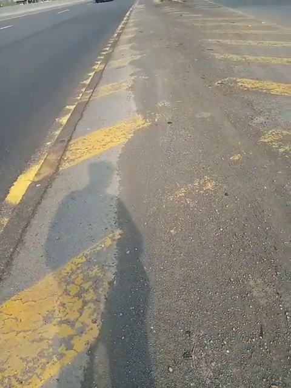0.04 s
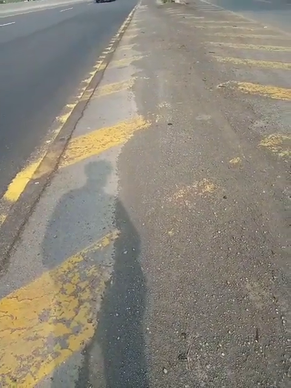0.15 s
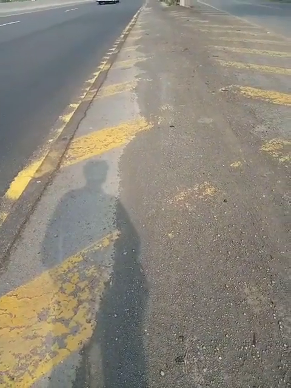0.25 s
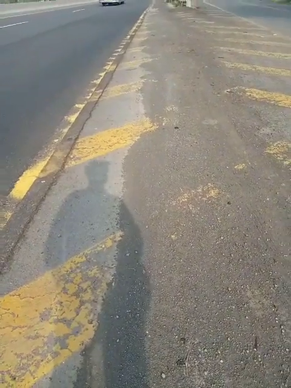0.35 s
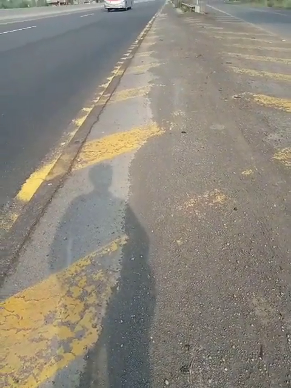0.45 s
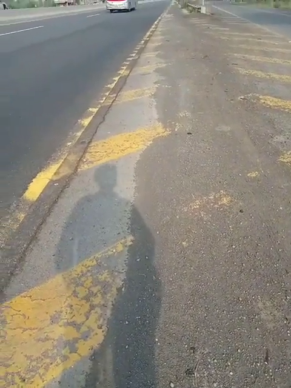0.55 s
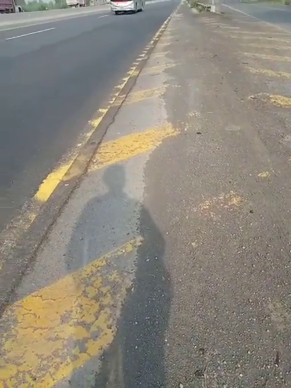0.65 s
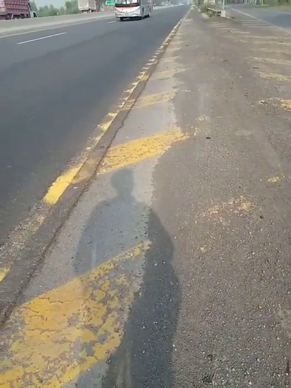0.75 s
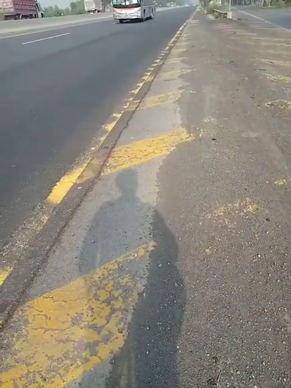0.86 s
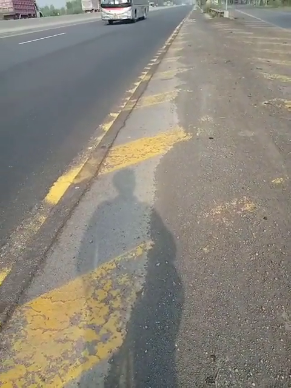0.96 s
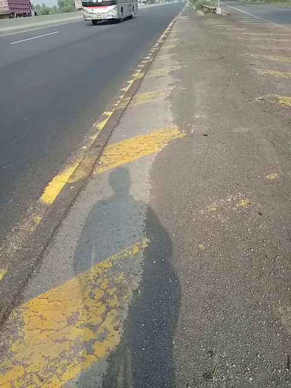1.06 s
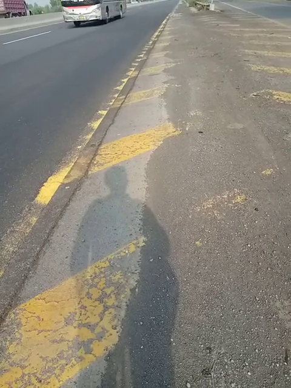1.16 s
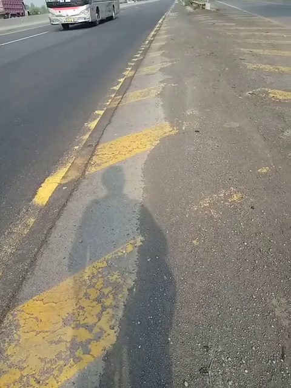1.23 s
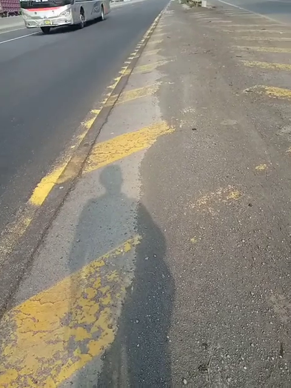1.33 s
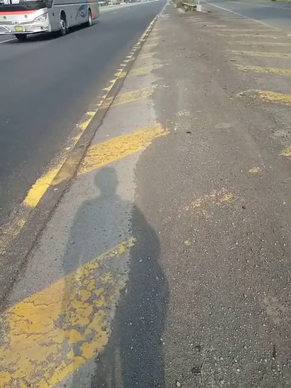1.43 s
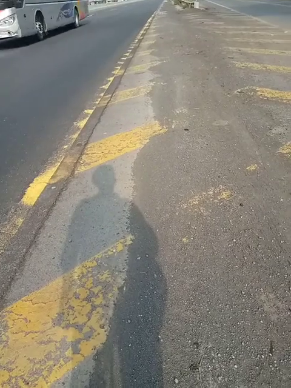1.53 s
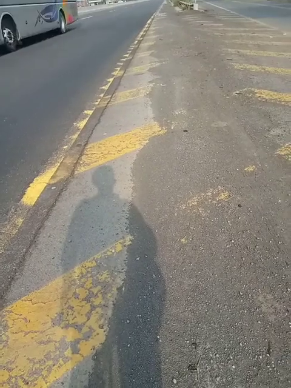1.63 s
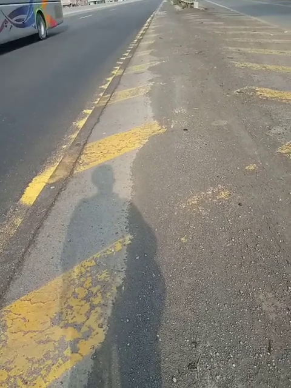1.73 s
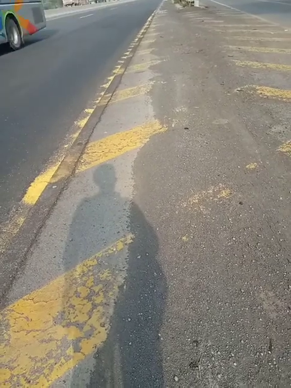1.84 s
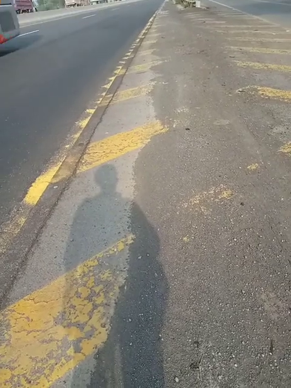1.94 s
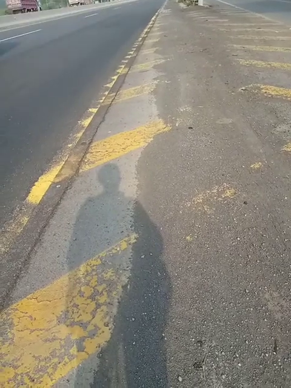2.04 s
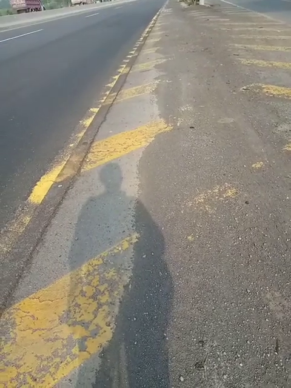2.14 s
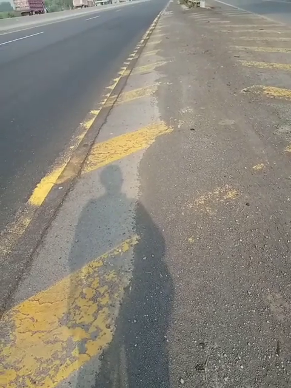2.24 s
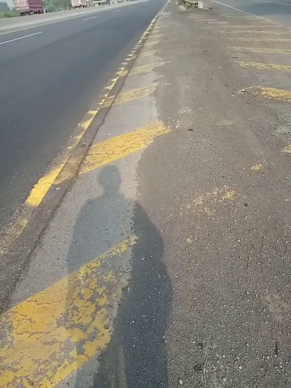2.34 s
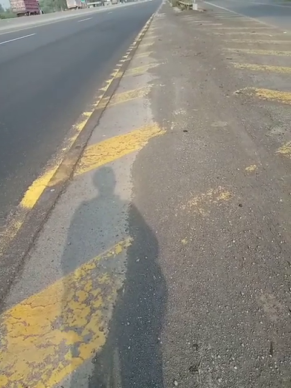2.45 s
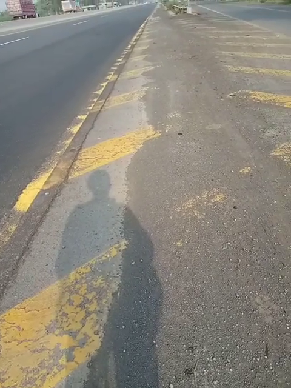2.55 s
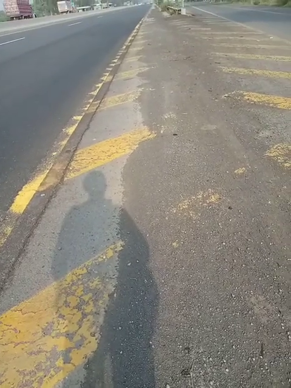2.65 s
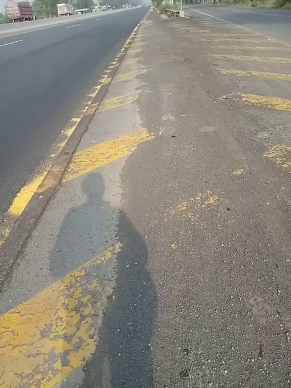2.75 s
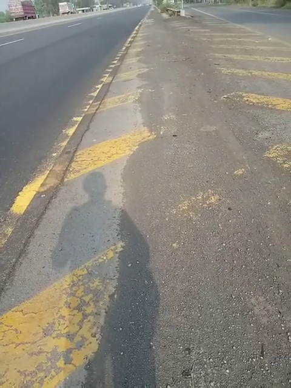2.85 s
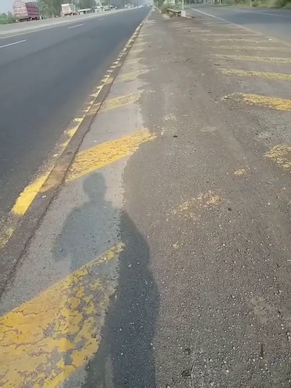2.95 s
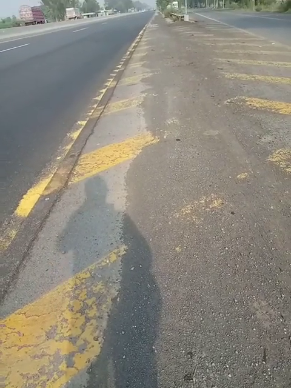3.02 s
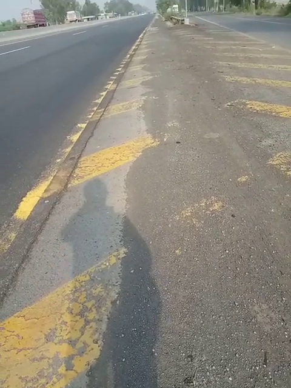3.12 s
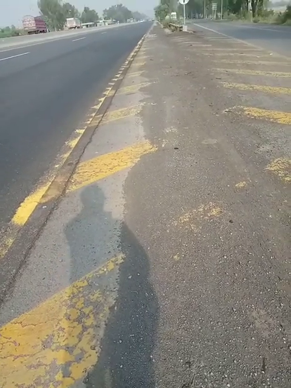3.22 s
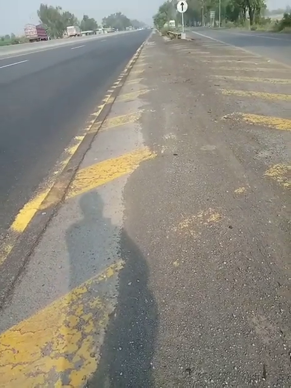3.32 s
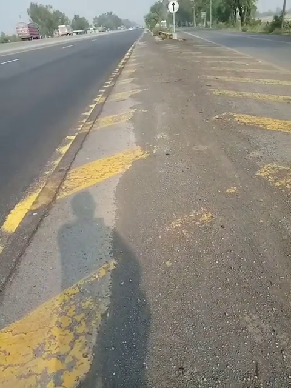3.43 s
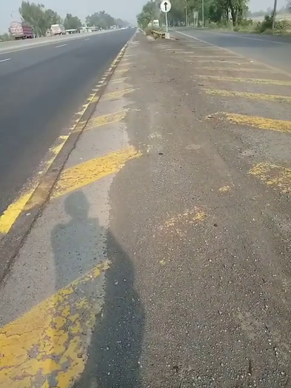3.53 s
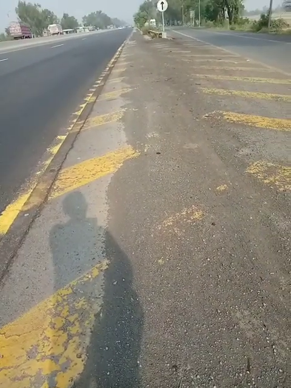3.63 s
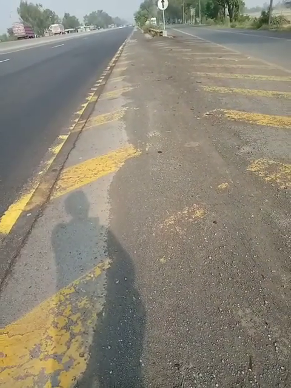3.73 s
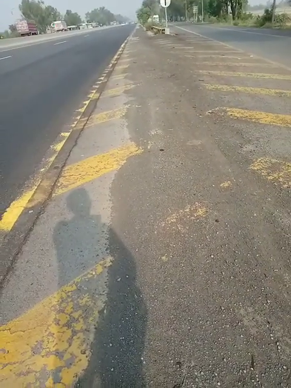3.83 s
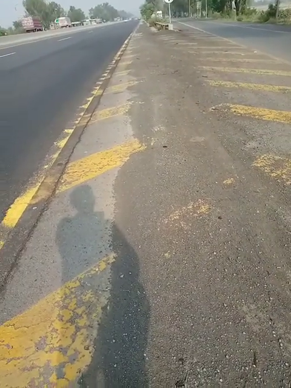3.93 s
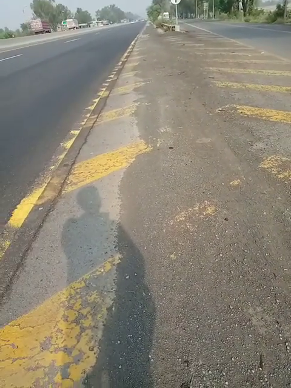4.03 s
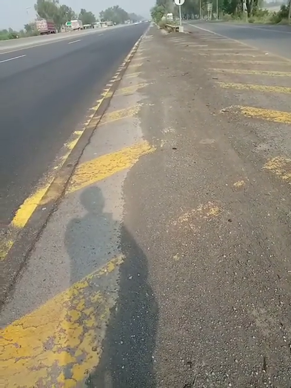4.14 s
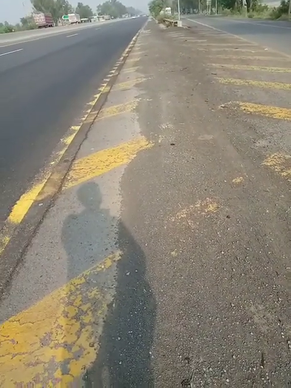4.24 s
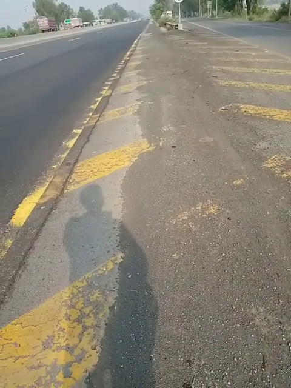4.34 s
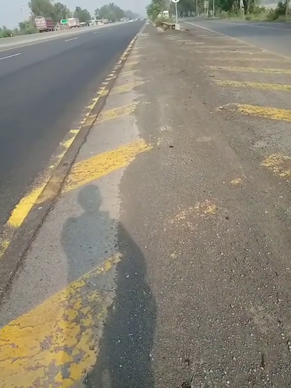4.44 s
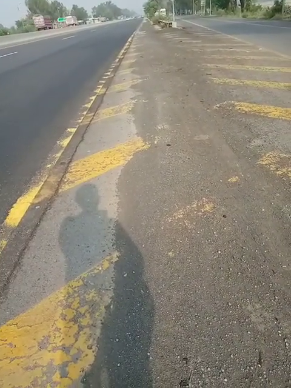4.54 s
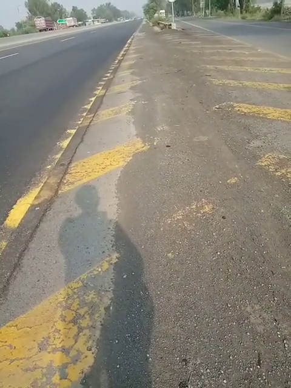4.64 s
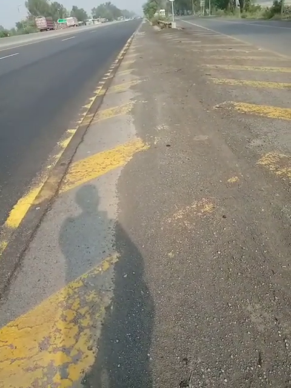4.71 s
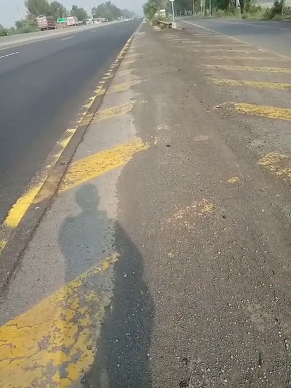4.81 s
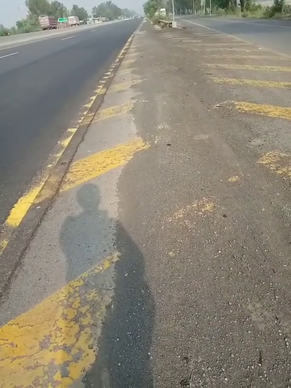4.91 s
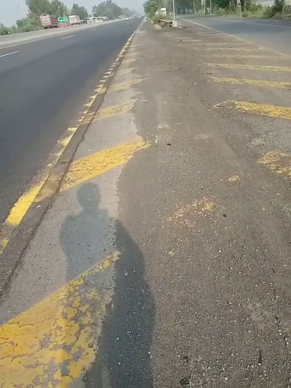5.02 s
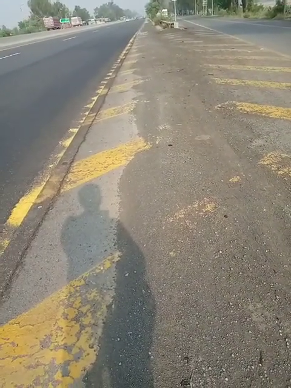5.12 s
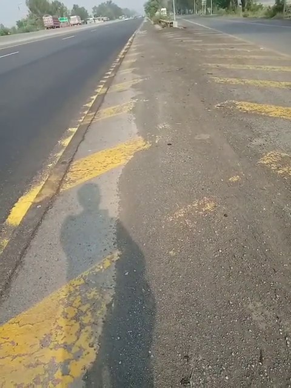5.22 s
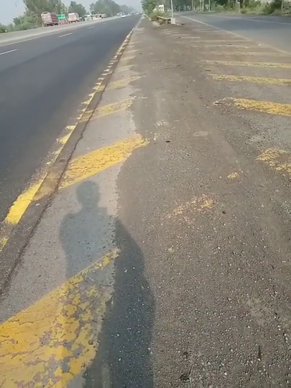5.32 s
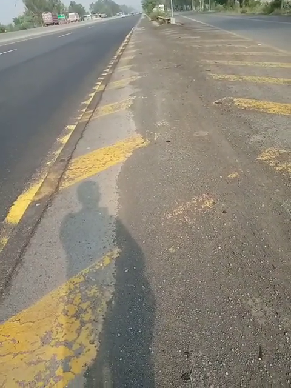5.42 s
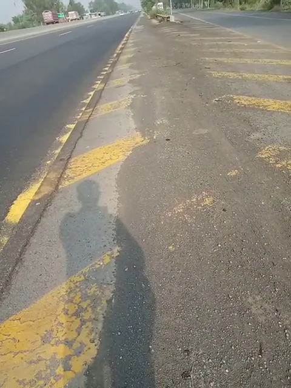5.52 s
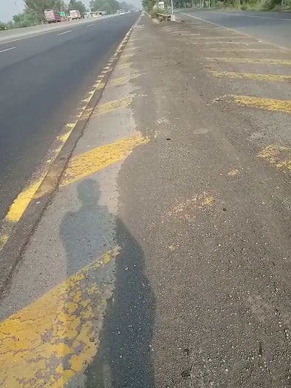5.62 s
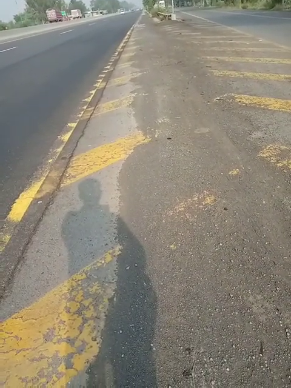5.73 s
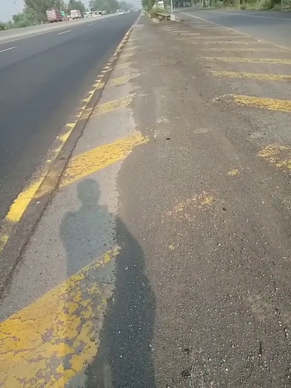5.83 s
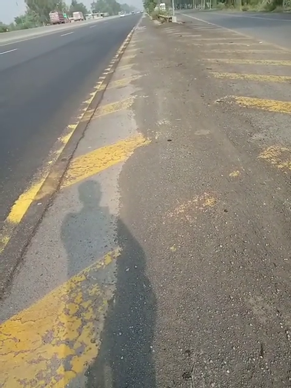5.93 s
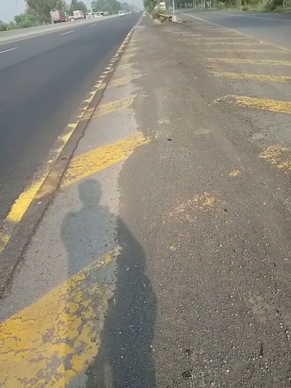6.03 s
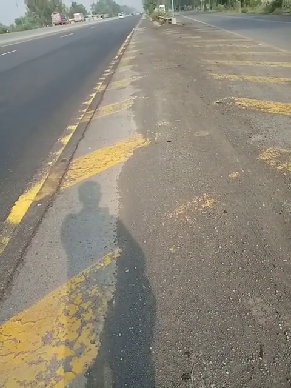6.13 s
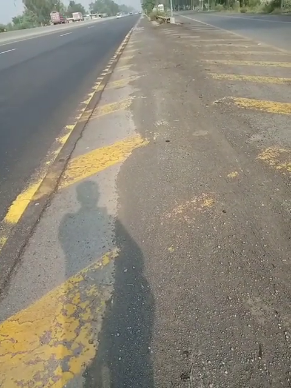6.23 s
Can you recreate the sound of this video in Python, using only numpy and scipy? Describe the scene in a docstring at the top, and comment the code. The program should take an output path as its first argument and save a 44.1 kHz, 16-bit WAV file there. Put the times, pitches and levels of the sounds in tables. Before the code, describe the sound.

Low traffic hum with light wind bumps and two tiny clicks, one loud bus pass-by with receding exhaust drone, then bird chips and whistles.

```python
"""On a highway verge, far traffic hums; two small clicks sound and wind buffets the microphone at times.
A diesel bus passes: bands of shaped noise swell with nearness as tyre roar and hiss, and engine sines drop in pitch.
Its tailpipe drones on as it leaves, while a bird chips, whistles four arched calls as summed overtones,
then chips again among faint rasps of noise."""
import sys
import numpy as np
from scipy import signal
from scipy.fft import rfft, irfft, next_fast_len
from scipy.io import wavfile
from scipy.ndimage import uniform_filter1d

SR = 44100
rng = np.random.default_rng(int(sys.argv[2]) if len(sys.argv) > 2 else 0)


def store_pcm(level_fs):
    """Save levels as 16-bit WAV."""
    pcm = np.round(np.clip(level_fs, -1, 1) * 32767).astype(np.int16)
    wavfile.write(sys.argv[1], SR, np.atleast_2d(pcm).T)


N = 276507
TIME = np.arange(N) / SR
HOP, WINDOW = 256, 1024  # samples per step and per frame of the noise spectra
FRAME_S = np.arange(N // HOP + 5) * HOP / SR
BIN_HZ = np.fft.rfftfreq(WINDOW, 1 / SR)

# closest moment of the bus, its closest distance / speed
PASS_S, PASS_SPREAD_S = 2.47, 0.2302

# passes: bus front wheels, body, rear wheels, then another vehicle farther off (two rows) and a late faint one
# closest_s, spread_s (distance / speed, before each band's breadth), rumble_db, roar_db, rasp_db, hiss_db
PASS_ROWS = [(1.909, 0.25, -42, -37.5, -57.5, -52.5), (2.11, 0.35, -26, -29.5, -40.5, -45.5),
             (2.41, 0.19, -40, -26.5, -37, -42.5), (3.43, 0.53, -45.5, -59, -51, -67),
             (3.88, 0.82, -52, -45.5, -68, -73.5), (6.6, 0.5, -52, -57.5, -61.5, -78)]


def gain_of(db):
    """Decibels to amplitude."""
    return 10 ** (np.asarray(db) / 20)


def evened(x):
    """Scales to rms 1."""
    return x / np.sqrt(np.mean(x ** 2) + 1e-20)


def curve(rows, t):
    """Joins rows by straight lines."""
    return np.interp(t, *np.transpose(rows))


def read(points, hz):
    """Reads a spectrum on a log-frequency axis."""
    f, value = np.transpose(points)
    return np.interp(np.log(hz + 1), np.log(f + 1), value)


def bell(x, centre, spread):
    """Gaussian hump of height 1."""
    return np.exp(-.5 * ((x - centre) / spread) ** 2)


def add(mix, s, sound):
    """Mixes a sound in at time s."""
    part = mix[round(s * SR):][:len(sound)]
    part += sound[:len(part)]


def filtered(x, response):
    """Filters by a gain given as a function of frequency."""
    size = next_fast_len(N + 4096)
    spectrum = rfft(x, size) * response(np.fft.rfftfreq(size, 1 / SR))
    return irfft(spectrum, size)[:N]


def noise(response):
    """Coloured noise of rms 1."""
    return evened(filtered(rng.standard_normal(N), response))


def waver(rate_hz):
    """Slow random drift of rms 1, low-passed at about rate_hz."""
    f = np.fft.rfftfreq(2048, HOP / SR)
    slow = irfft(rfft(rng.standard_normal(2048)) * bell(f, 0, rate_hz))[:len(FRAME_S)]
    return np.interp(TIME, FRAME_S, evened(slow))


def distance(s, spread_s):
    """Distance of something driving past, in units of its closest distance."""
    return np.hypot(1, (TIME - s) / spread_s)


def road(lumpy_db=0.45):
    """Body rumble, tyre roar, tread rasp and the hiss of air squeezed from the tread."""
    colour, sweep = road_colour(), hiss_beams()
    # bands and level-setting cores, Hz
    low, mid, high, top = (1, 400), (400, 1400), (1400, 3200), (3200, 20000)
    low_core, top_core = (125, 400), (4400, 5600)
    _, _, rumble_db, roar_db, rasp_db, hiss_db = np.transpose(PASS_ROWS)

    rumble = traffic_level(rumble_db, breadth=1.68, far_db=-39.5, recede_db_per_s=1.44)
    rumble = rumble * gain_of(lumpy_db * waver(4.1))
    roar = traffic_level(roar_db, breadth=1.048, far_db=-49.5, recede_db_per_s=0.62)
    rasp = traffic_level(rasp_db, breadth=1.063, far_db=-55.0, recede_db_per_s=2.15)
    hiss = traffic_level(hiss_db, breadth=1.266, far_db=-67.5, recede_db_per_s=1.5)

    return (road_layer(colour, sweep, rumble, low, low_core, patchy_db=0.04, flutter_db=-0.47)
            + road_layer(colour, sweep, roar, mid, mid, patchy_db=0.82, flutter_db=0.3)
            + road_layer(colour, sweep, rasp, high, high, patchy_db=0.84, flutter_db=1.26)
            + road_layer(colour, sweep, hiss, top, top_core, patchy_db=1.2, flutter_db=1.1))


def road_layer(colour, sweep, level, band, core, patchy_db, flutter_db):
    """One band of road noise; its core follows the traffic level and turbulent air makes it patchy."""
    f = BIN_HZ + 1
    shape = colour / np.sqrt((1 + (band[0] / f) ** 12) * (1 + (f / band[1]) ** 12))
    in_core = (f > core[0]) & (f < core[1])
    core_power = (colour[:, in_core] ** 2).sum(1, keepdims=True)
    real, imag, patches = rng.standard_normal((3, len(FRAME_S), len(f)))
    patches = uniform_filter1d(patches, size=14, axis=0)
    patches = evened(uniform_filter1d(patches, size=9, axis=1))
    size = sweep * shape / np.sqrt(core_power) * gain_of(patchy_db * patches)
    z = (real + 1j * imag) * size
    sound = signal.istft(z.T, nperseg=WINDOW, noverlap=WINDOW - HOP)[1][:N]
    sound = sound * np.sqrt(1.5)  # makes up for the overlapping windows
    return sound * level * gain_of(flutter_db * waver(18))


def road_colour(dull_db=14, bright_spread_s=0.48, bright_s=2.04):
    """The spectrum turns from the front of the bus to its side, its rear and far traffic (frames x bins)."""
    # road noise spectra by side shown, each: pitch_hz, level_db (per Hz)
    ahead, nearing, abreast = [(45, -33), (70, 1.5), (120, 1), (200, 4), (310, -1.5), (480, -16.5),
                               (680, -20), (900, -18.5), (1200, -25), (1800, -21.5), (2050, -27),
                               (3400, -25.5), (5400, -35), (6300, -32.5)], [(25, -22), (45, -15), (70, -23), (120, -4.5), (190, 6),
                                              (300, -7), (420, -12.5), (600, -16.5), (1100, -23.5),
                                              (2000, -21.5), (2700, -23.5), (4300, -23.5), (5500, -27),
                                              (6400, -27.5)], [(25, -26), (45, -9), (70, -11), (120, 0),
                                                               (190, 3.5), (330, -3.5), (500, -4),
                                                               (800, -2.5), (1300, -12.5), (2400, -25),
                                                               (3500, -18), (4400, -18.5), (5200, -19.5),
                                                               (6300, -17)]
    behind, far = [(25, -31), (45, -13.5), (70, -3.5), (100, -10), (170, 2), (320, -7), (500, -20),
                   (850, -22), (1300, -25), (2100, -25.5), (2900, -29), (3600, -35.5), (4600, -29.5),
                   (6400, -35)], [(25, -25.5), (45, -21.5), (70, 12), (100, -4.5), (200, 6), (320, -5),
                                   (500, -8.5), (850, -13), (1300, -23), (2100, -30.5), (3000, -30),
                                   (4000, -32), (5200, -30.5), (6400, -39)]
    # moments when each spectrum holds alone: time_s
    view_s = [1.0, 1.85, 2.45, 2.9, 4.3]
    views = [ahead, nearing, abreast, behind, far]
    db = 0
    for share, view in zip(np.eye(len(views)), views):
        db = db + np.interp(FRAME_S, view_s, share)[:, None] * read(view, BIN_HZ)
    # the highest fizz only arrives while the wheels are close
    dull = 1 - bell(FRAME_S, bright_s, bright_spread_s)
    db = db - dull_db * np.outer(dull, np.interp(BIN_HZ, [7000, 13000], [0, 1]))
    return gain_of(db)


def hiss_beams():
    """Gain of the narrow beams of hiss that sweep past with the bus (frames x bins)."""
    # beams: centre_s, spread_s, centre_hz, spread_hz, boost_db
    beam_rows = [(1.25, 0.4, 10400, 800, 8.5), (1.6, 0.15, 2880, 450, 6.5), (2.254, 0.054, 4900, 403, 9),
                 (2.354, 0.059, 5880, 500, 5.5), (2.467, 0.26, 2375, 350, 9), (2.6, 0.22, 4290, 200, 6.5),
                 (2.752, 0.16, 2960, 180, 10)]
    return gain_of(sum(db * np.outer(bell(FRAME_S, s, spread_s), bell(BIN_HZ, hz, spread_hz))
                       for s, spread_s, hz, spread_hz, db in beam_rows))


def traffic_level(peaks_db, breadth, far_db, recede_db_per_s, falloff=2.037):
    """Each pass fades as distance to the falloff, as it beams sideways, over slowly receding far traffic."""
    power = gain_of(far_db - recede_db_per_s * TIME) ** 2
    for (s, spread_s, *_), db in zip(PASS_ROWS, peaks_db):
        power = power + (gain_of(db) / distance(s, breadth * spread_s) ** falloff) ** 2
    return np.sqrt(power)


def engine(firing_hz=115.27, mach=.0775, wander=0.003, fading_db=1.8, beside_spread_s=0.18, jitter_rad=.08):
    """Doppler-shifted engine and fan lines, heard from the flank while passing, then from the tailpipe."""
    # lines: multiple (of the firing rate), loudest_s, flank_db (at loudest), pipe_db (relative to tailpipe level)
    order_rows = [(.85, 2.75, -44.5, -8), (.995, 2, -50, 1), (1.2, 2.05, -39.5, -25),
                  (1.5, 2.55, -35.5, -13), (1.64, 2.0, -34.5, -15), (2, 2.285, -28, -5.5),
                  (2.28, 2.24, -29.5, -16), (3, 2.2, -41, -12), (3.26, 2.1, -48.5, -15.5),
                  (4.04, 2.337, -32, -31.5), (4.58, 2.2, -40, -25.5), (5, 2.3, -41.5, -21)]
    hz = firing_hz / (1 - mach * bearing(TIME)) * (1 + wander * waver(4.5))
    turns = np.cumsum(hz) / SR
    tailpipe = tailpipe_level()
    out = np.zeros(N)
    for multiple, loudest_s, flank_db, pipe_db in order_rows:
        # each line beams its own way
        flank = 1 / np.hypot(1, ((TIME - loudest_s) / beside_spread_s) ** 2)
        size = gain_of(flank_db) * flank + gain_of(pipe_db) * tailpipe
        size = size * gain_of(fading_db * waver(4.5))
        phase = 2 * np.pi * (multiple * turns + rng.random()) + jitter_rad * multiple * waver(17)
        out += np.sqrt(2) * size * np.sin(phase)
    return out


def bearing(t):
    """Cosine of the angle to the bus: 1 coming, 0 abreast, -1 leaving."""
    return (PASS_S - t) / np.hypot(PASS_S - t, PASS_SPREAD_S)


def tailpipe_level(open_s=2.64, turn_s=0.037, abreast_db=-31.5, front_loss_db=-22.5, fall_db_per_decade=13):
    """The exhaust drone opens up behind the bus and fades with distance."""
    shaded = .5 - .5 * np.tanh((TIME - open_s) / (2 * turn_s))
    fall_db = fall_db_per_decade * np.log10(distance(PASS_S, PASS_SPREAD_S))
    return gain_of(abreast_db + front_loss_db * shaded - fall_db)


def bird():
    """Arched whistles, quick gliding chips and breathy rasps."""
    return whistles() + chips() + rasps()


def whistles():
    """Four arched calls, each a sum of overtones without the fundamental."""
    # calls: start_s, length_s, top_hz (of the fundamental), arch_depth (factor), level_db
    call_rows = [(3.357, .124, 2108, 1.25, -53.5), (3.608, .119, 2004, .9, -50),
                 (3.853, .127, 1998, 1, -49), (4.113, .134, 1935, .65, -49)]
    # pitch arch at depth 1: share (of the call), offset (relative to top_hz)
    arch = [(0, -.1), (.11, -.045), (.26, -.01), (.48, 0), (.72, -.01), (.86, -.05), (1, -.21)]
    # overtones: multiple, level_db (relative)
    partials = [(2, 0), (3, -19), (4, -27)]
    out = np.zeros(N)
    for s, length_s, top_hz, depth, db in call_rows:
        u = np.linspace(0, 1, int(length_s * SR))
        phase = 2 * np.pi * np.cumsum(top_hz * (1 + depth * curve(arch, u))) / SR
        tone = sum(gain_of(partial_db) * np.sin(round(k) * phase) for k, partial_db in partials)
        add(out, s, gain_of(db) * evened(tone * signal.windows.tukey(len(u), .17)))
    return out


def chips(jitter=0.027):
    """Thin sine strokes gliding up or down with a shaky pitch."""
    # strokes: start_s, length_s, start_hz, end_hz (both before jitter), level_db
    chip_rows = [(3.141, 0.088, 6650, 6550, -64), (3.214, 0.015, 4420, 3220, -52.5),
                 (4.616, .015, 5780, 5300, -63), (4.972, 0.017, 6500, 5630, -62),
                 (5.003, 0.01, 4180, 5500, -66), (5.005, 0.02, 4960, 4140, -60),
                 (6.168, 0.027, 6980, 5000, -55.5), (6.206, 0.014, 4050, 6300, -57),
                 (6.21, 0.013, 5900, 4170, -51), (6.218, 0.024, 4450, 3150, -60)]
    out = np.zeros(N)
    for s, length_s, start_hz, end_hz, db in chip_rows:
        hz = np.geomspace(start_hz, end_hz, int(length_s * SR))
        shake = evened(uniform_filter1d(rng.standard_normal(len(hz)), size=30))
        hz = hz * (1 + jitter * shake)
        tone = np.sin(2 * np.pi * np.cumsum(hz) / SR)
        add(out, s, gain_of(db) * evened(tone * signal.windows.tukey(len(hz), .5)))
    return out


def rasps():
    """Faint raspy chirps: short humps of coloured noise."""
    # rasps: centre_s, spread_s, level_db
    rasp_rows = [(4.98, .018, -59), (5.22, .018, -69), (5.335, .016, -68), (5.567, .019, -63),
                 (5.8, .019, -63.5), (5.91, .016, -62.5), (6.205, .022, -58), (6.255, .014, -60)]
    # spectrum: pitch_hz, level_db (relative)
    colour = [(2000, -31.5), (3500, -1), (5000, 12), (6400, 7.5), (8000, -19)]
    level = sum(gain_of(db) * bell(TIME, s, spread_s) for s, spread_s, db in rasp_rows)
    return level * noise(lambda f: gain_of(read(colour, f)))


def off_the_ground(x, delay_s=0.0086, echo_db=-16):
    """A sound with its bounce off the asphalt."""
    return filtered(x, lambda f: 1 + gain_of(echo_db) * np.exp(-2j * np.pi * f * delay_s))


def clicks():
    """Tiny dry ticks close to the microphone: decaying modes."""
    # ticks: start_s, peak_db, pitch (factor on the modes)
    click_rows = [(0.1184, -15.5, 0.98), (1.1682, -20, 1.2)]
    # modes at pitch 1: mode_hz, level_db (relative), t60_s
    modes = [(4260, -18, .003), (5560, 2.5, .0022), (6600, 5, 0.0018), (10350, 13.5, 0.0017)]
    out, t = np.zeros(N), np.arange(512) / SR
    for s, db, pitch in click_rows:
        ring = sum(gain_of(mode_db - 60 * t / t60_s) * np.sin(2 * np.pi * pitch * hz * t)
                   for hz, mode_db, t60_s in modes)
        add(out, s, gain_of(db) * ring / abs(ring).max())
    return out


def wind(centre_hz=100, width_hz=33):
    """Soft low buffets on the microphone: swells of narrow low noise."""
    # gusts: centre_s, spread_s, level_db
    gust_rows = [(.12, 0.051, -58), (0.478, 0.039, -31), (0.885, 0.26, -42), (1.282, 0.031, -35.5),
                 (1.454, 0.044, -37), (2.66, 0.053, -38.5)]
    level = sum(gain_of(db) * bell(TIME, s, spread_s) for s, spread_s, db in gust_rows)
    return noise(lambda f: bell(f, centre_hz, width_hz)) * level


def scene():
    """Everything heard from the verge."""
    return (road() + engine() + off_the_ground(bird()) + clicks() + wind())[None]


def record(dry, low_cut_hz=48, edge_hz=15750):
    """The phone thins the deep bass and the treble; then the band limit."""
    # treble response: pitch_hz, gain_db
    treble = [(6600, 0), (7200, -8), (8000, -21), (9500, -26), (12000, -30), (14000, -31), (14800, -18),
              (16000, -18)]
    coloured = filtered(dry[0], lambda f: gain_of(read(treble, f)) * f ** 3 / np.hypot(f ** 3, low_cut_hz ** 3))
    band_limit = signal.firwin(511, edge_hz, window=("kaiser", 9), fs=SR)
    return signal.oaconvolve(coloured, band_limit, "same")[None]


dry = scene()
out = record(dry)
store_pcm(out)
```